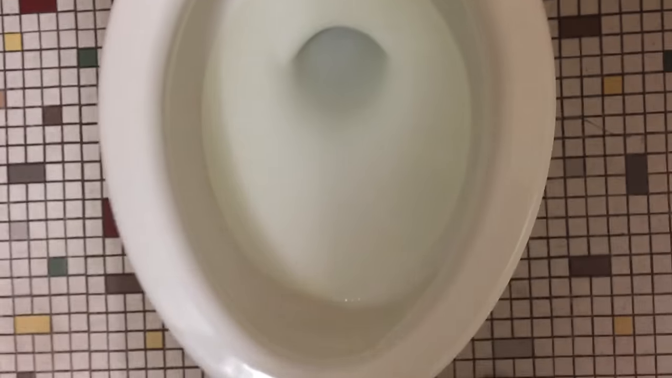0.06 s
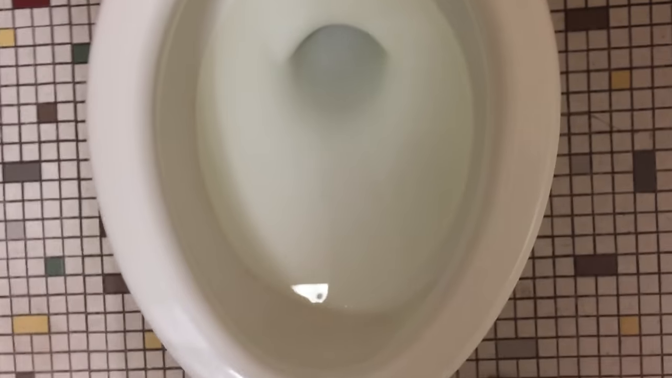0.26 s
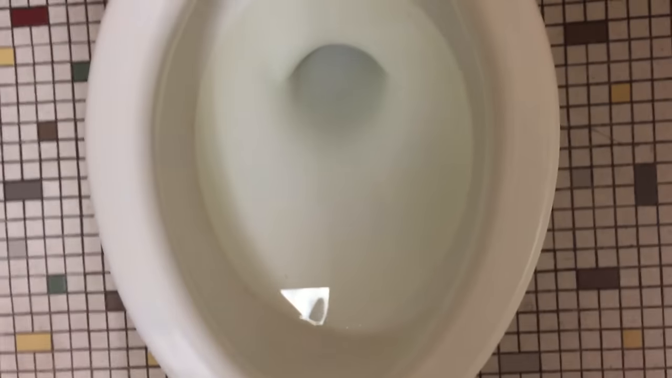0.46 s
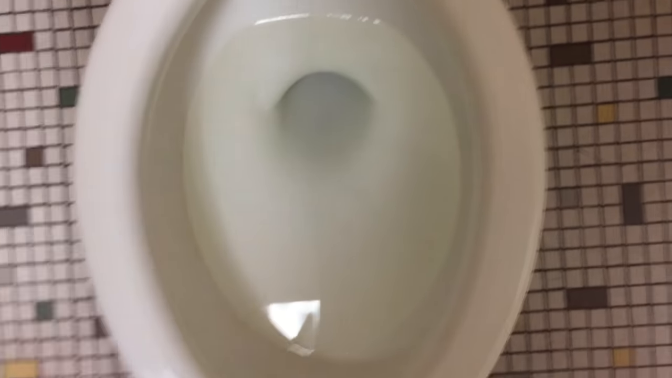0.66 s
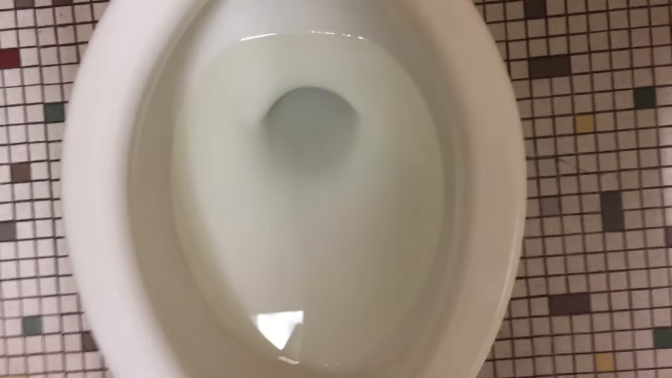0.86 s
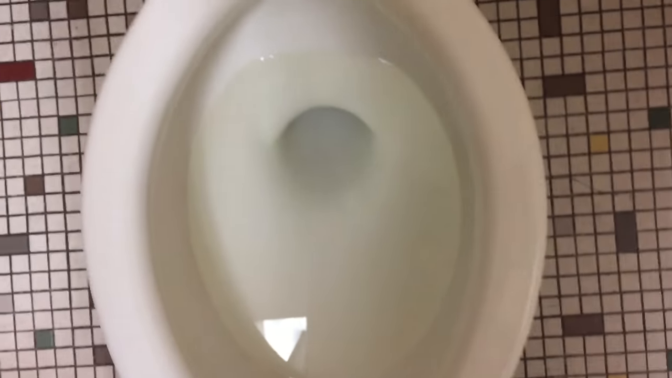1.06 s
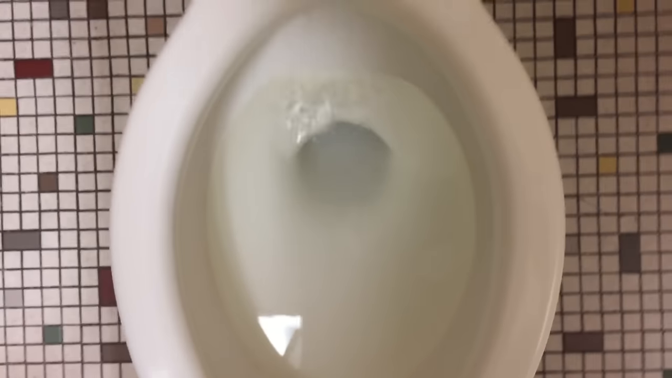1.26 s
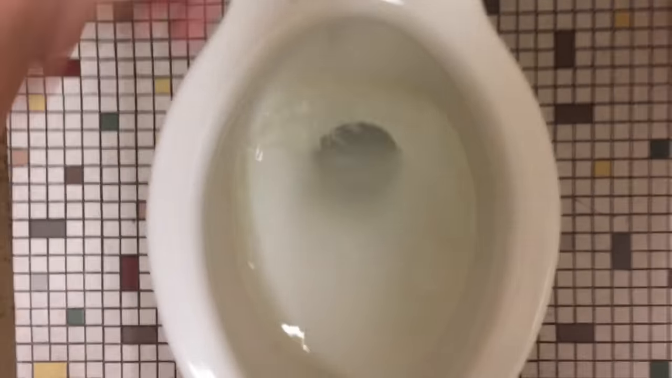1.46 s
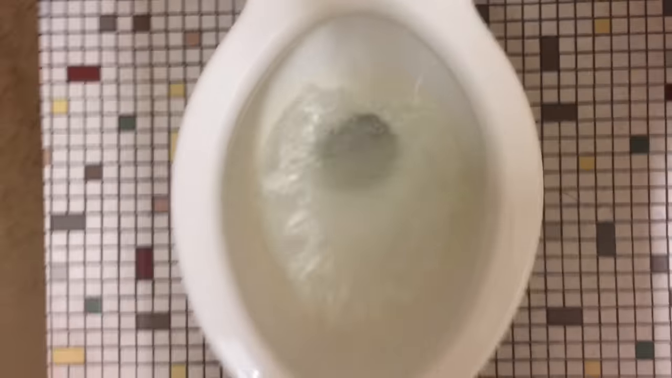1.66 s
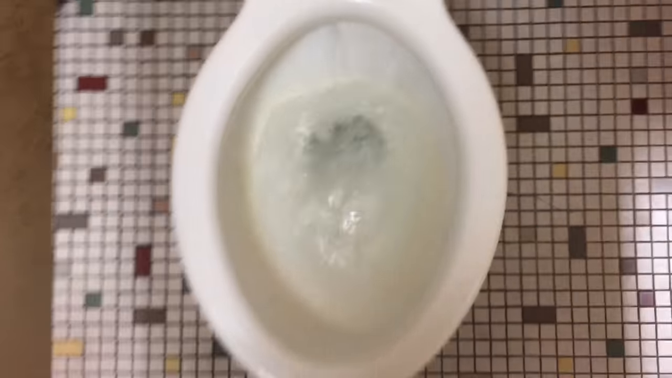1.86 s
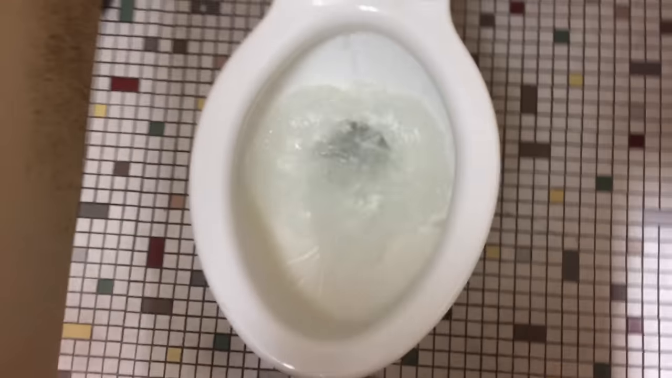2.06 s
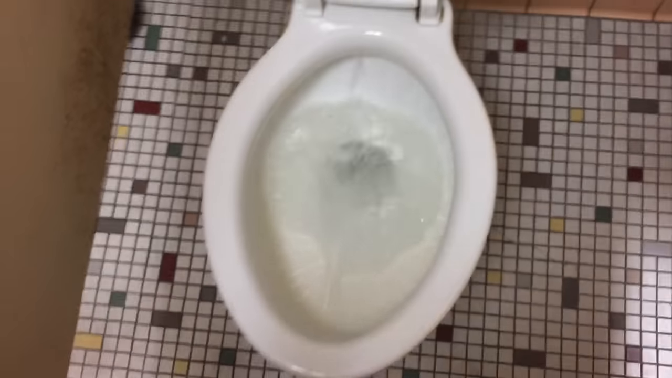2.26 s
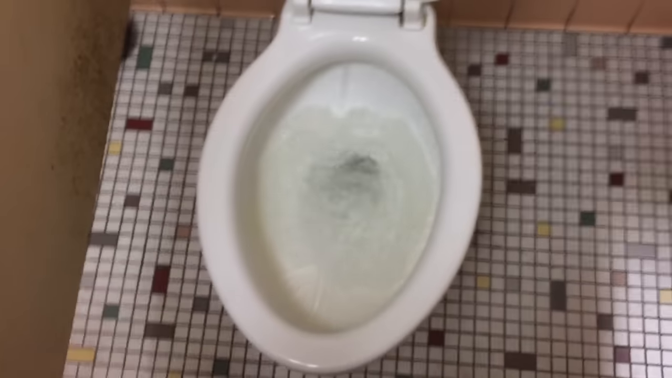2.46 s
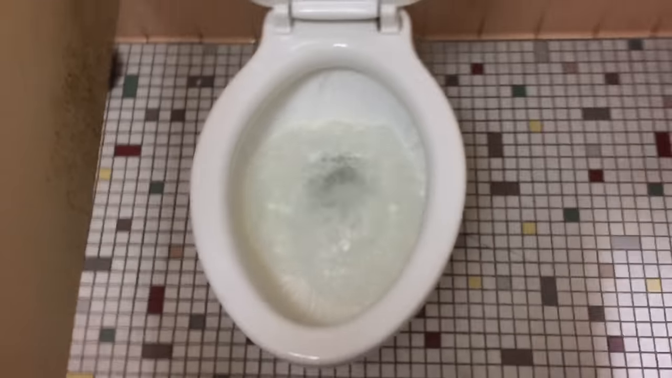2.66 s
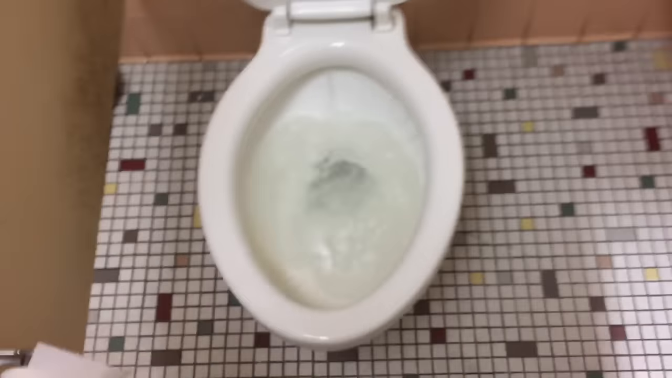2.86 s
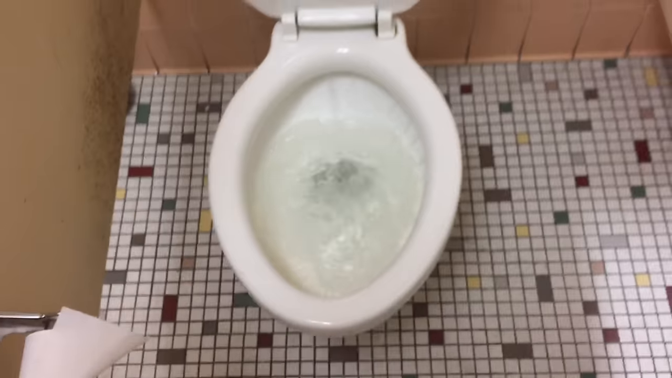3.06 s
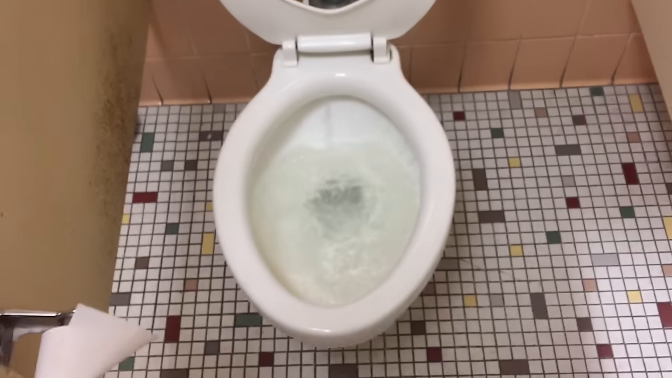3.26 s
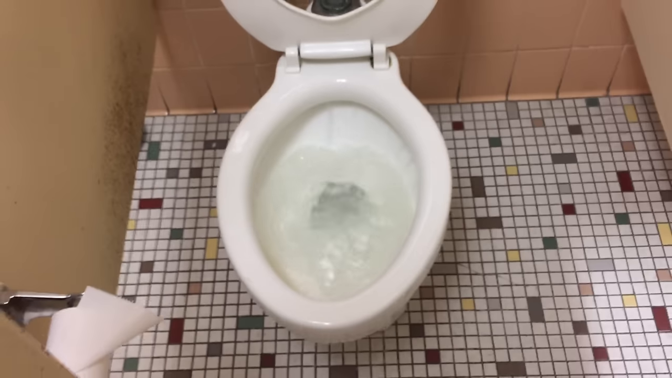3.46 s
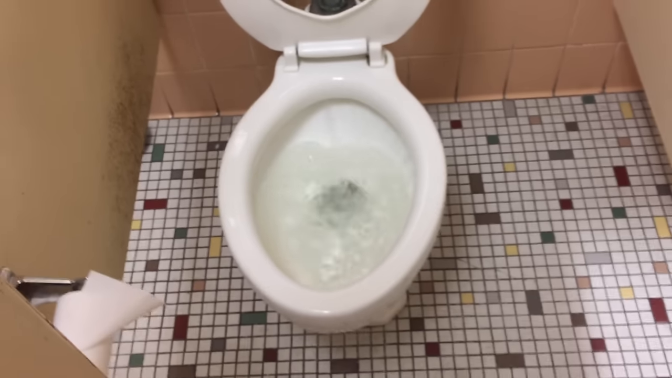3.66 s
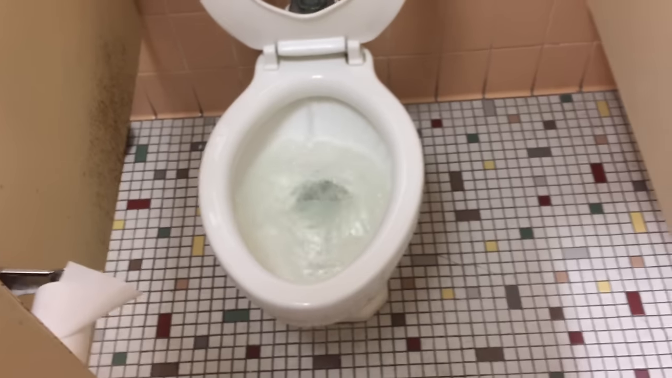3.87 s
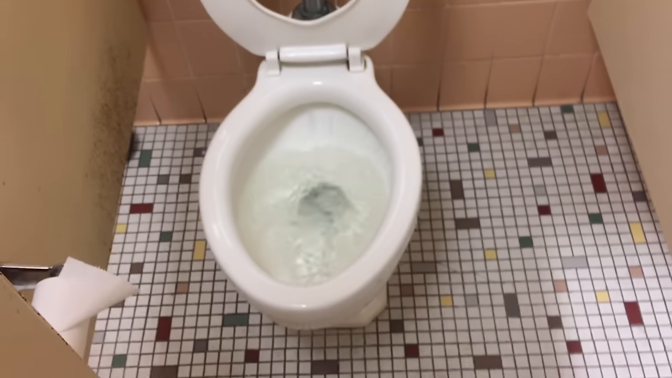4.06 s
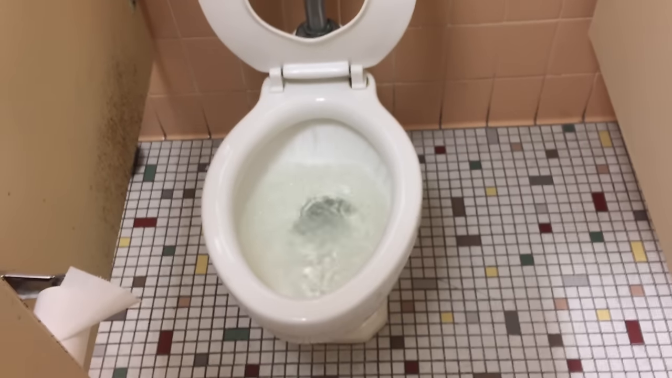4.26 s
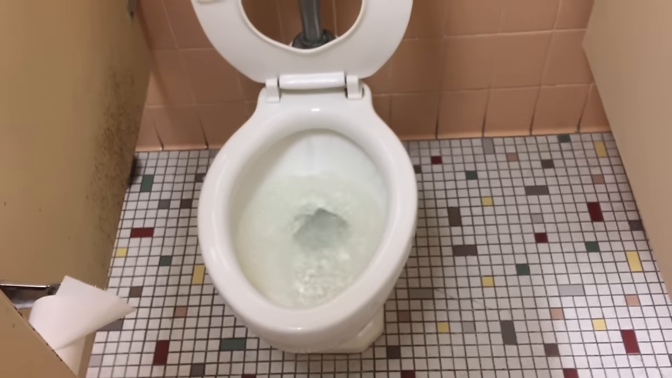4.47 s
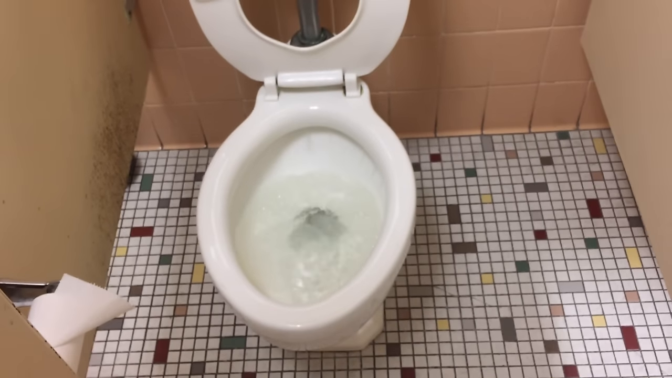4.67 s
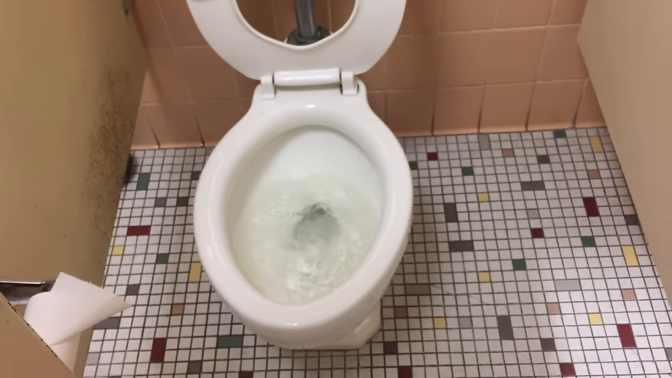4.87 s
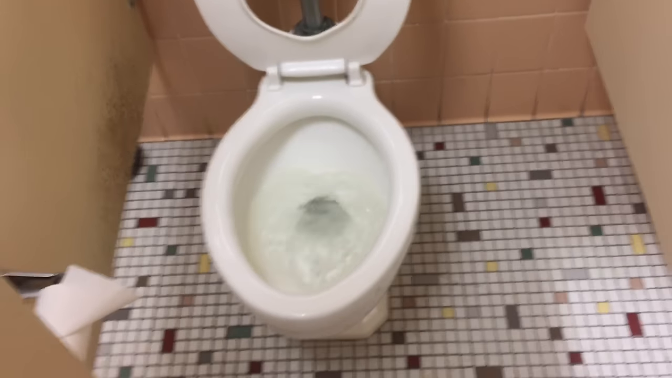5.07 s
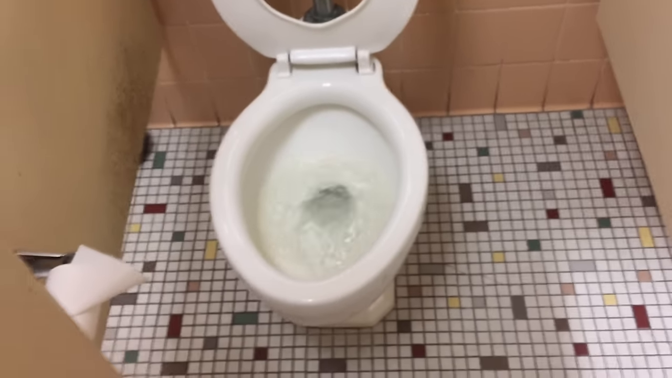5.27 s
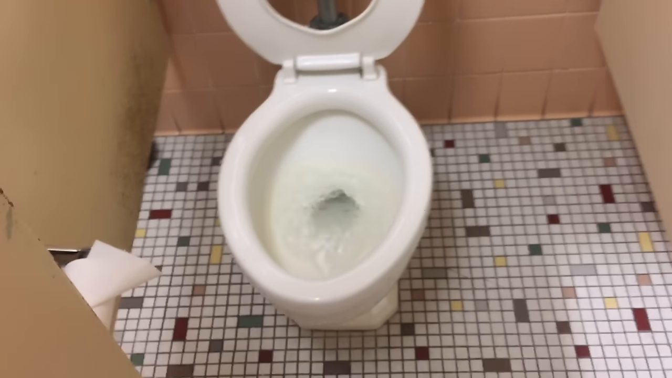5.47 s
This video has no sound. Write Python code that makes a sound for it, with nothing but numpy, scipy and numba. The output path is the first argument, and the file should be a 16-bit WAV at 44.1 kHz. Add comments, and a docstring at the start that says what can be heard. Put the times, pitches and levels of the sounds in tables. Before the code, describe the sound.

In a small tiled restroom stall, close above the bowl, faint scuffs, dull bumps and a sharp metallic clack come first. A tiny squeak leads into a sudden hollow, gurgling roar of the flush. Bright splashing and bubbling water follows, loudest soon after, then gradually thins to slaps and trickles beneath a steady valve hiss. Mono-like, with short tile echo.

```python
"""A small tiled stall with a flush-valve toilet, heard from above the bowl.
A clack and dull bumps come first: struck fittings ring in damped modes and the stall booms in its low modes.
Then the valve squeaks open by stick-slip and hisses, and a jet drives air pockets through the resonant trap.
Rim water splashes as showers of ringing bubbles and gurgles in the air modes of the bowl.
The splash dies away under the hiss of the valve, which is turbulence noise."""
import sys
import numpy as np
from scipy import signal
from scipy.fft import rfft, irfft
from scipy.io import wavfile
from scipy.ndimage import uniform_filter1d, map_coordinates
from numba import njit

SR = 44100
rng = np.random.default_rng(int(sys.argv[2]) if len(sys.argv) > 2 else 0)


def dump_mix(stems):
    """Bounce the given channels to the path in sys.argv[1] as a 16-bit WAV at rate SR."""
    frames = np.atleast_2d(stems).T  # one column per channel
    limited = np.clip(frames, -1, 1)  # hard clip at full scale
    pcm = np.round(limited * 32767).astype(np.int16)
    wavfile.write(sys.argv[1], SR, pcm)


N = 242991
TIME = np.arange(N) / SR
TOP_HZ = 15800  # upper limit of the finished sound

# rim water landing in the bowl, which drives splash, bubbles and gurgle: (time [s], flow [dB])
RIM_FLOW = [(1.08, -14), (1.2, -8), (1.35, -19), (1.57, -10), (1.68, -0.5), (1.92, -3), (2.05, -4),
            (2.6, -6), (2.72, -8), (4.58, -10.5), (5.0, -13), (5.18, -20), (5.51, -21)]
# level of the fine spray: (time [s], level [dB])
SPRAY_LEVEL = [(1.08, -47), (1.35, -39.5), (1.65, -33.5), (2.1, -30.5), (3.1, -33.5), (3.8, -33.5),
               (4.53, -36), (4.68, -41), (4.82, -35), (5.51, -44)]
# spectrum of splashing water: (frequency [Hz], level [dB])
SPLASH_SPECTRUM = [(40, -65), (300, -46), (1000, 5.5), (1450, -11), (2100, 0), (2800, 1), (3600, -1.5),
                   (4200, -4.5), (4900, -13), (6000, -11), (9000, -11.5), (16000, -42)]
# spectrum of water forced through the valve: (frequency [Hz], level [dB])
VALVE_SPECTRUM = [(40, -18), (200, 0.5), (1200, -8.5), (2000, -22), (2500, 3), (2900, -2), (3300, 1),
                  (3900, 1.5), (4900, -8.5), (5500, 1.5), (6500, 0.5), (7650, -8), (8800, -3.5),
                  (10450, -8), (10900, -9.5), (12800, -7), (16000, -8)]


def undb(db):
    """Amplitude gain is ten to the power of decibels over twenty."""
    return 10 ** (np.asarray(db) / 20)


def unit(x):
    """Normalisation of the effective (rms) value to 1."""
    return x / np.sqrt(np.mean(x ** 2))


def curve(table, axis=1):
    """Linear interpolation in time of one column of a table."""
    rows = np.array(table)
    return np.interp(TIME, rows[:, 0], rows[:, axis])


def fader(table, axis=1):
    """Amplitude envelope from a dB column, decaying exponentially away from its span in time."""
    before = np.maximum(table[0][0] - TIME, 0)
    after = np.maximum(TIME - table[-1][0], 0)
    return undb(curve(table, axis=axis) - 400 * (before + after))  # 400 dB per s


def swell(start_s, rise_s, fade_db_per_s):
    """Raised-sine onset to 1, then exponential decay (a constant number of dB per second)."""
    age = TIME - start_s
    onset = np.sin(np.pi / 2 * np.clip(age / rise_s, 0, 1)) ** 2
    return onset * undb(-fade_db_per_s * np.maximum(age - rise_s, 0))


def surges(table, release_s, axis=2):
    """Attack, hold and release envelopes, one for each row (time [s], length [s], level [dB], ..)."""
    out = np.zeros(N)
    attack_s = 0.012
    for row in table:
        age = TIME[:int((row[1] + release_s) * SR)]
        release = np.clip((row[1] - age) / release_s + .5, 0, 1)  # centred on the stated length
        shape = np.minimum(age / attack_s, 1) * release
        start = int(row[0] * SR)
        out[start:start + len(age)] += undb(row[axis]) * shape[:N - start]
    return out


def steady(x, span_s):
    """Short-term rms levelling over spans of this length; faster flutter stays."""
    size = int(span_s * SR)
    power = uniform_filter1d(uniform_filter1d(x ** 2, size), size)
    return x / np.sqrt(np.abs(power) + 1e-12)


def walk(rate):
    """Low-frequency random modulation: held normal values, smoothed, at this many values per second."""
    size = int(SR / rate)
    steps = np.repeat(rng.standard_normal(N // size + 1), size)
    return uniform_filter1d(steps, size)[:N]


def colour(x, points):
    """Minimum-phase filtering, by the folded cepstrum, through points (frequency [Hz], level [dB])."""
    hz, db = np.transpose(points)
    size = 8192
    grid = np.maximum(np.arange(size // 2 + 1) * SR / size, 1)
    cepstrum = irfft(np.log(undb(np.interp(np.log(grid), np.log(hz), db))))
    cepstrum[1:size // 2] *= 2
    cepstrum[size // 2 + 1:] = 0
    response = irfft(np.exp(rfft(cepstrum)))
    return signal.fftconvolve(x, response)[:len(x)]


def resonate(x, modes):
    """Modal superposition of parallel resonances (frequency [Hz], width [Hz], level [dB])."""
    return sum(undb(db) * signal.lfilter(*signal.iirpeak(hz, hz / width, fs=SR), x)
               for hz, width, db in modes)


def cavity(x, modes):
    """Cascaded resonance: each mode (as in resonate) acts twice, so the valleys between them are deep."""
    return unit(sum(resonate(resonate(x, [(hz, width, 0)]), [(hz, width, db)]) for hz, width, db in modes))


def add(out, s, x, db):
    """Superposition of an event at s seconds whose first 20 ms have this rms level."""
    start = int(s * SR)
    x = x * undb(db) / np.sqrt(np.mean(x[:SR // 50] ** 2))
    out[start:start + len(x)] += x[:N - start]


def burst(t60_s):
    """Exponential decay of noise, by 60 dB in t60_s, over half a second."""
    t = TIME[:SR // 2]
    return rng.standard_normal(len(t)) * np.exp(-np.log(1000) * t / t60_s)


@njit
def ring(starts, hz, cycles, sizes, glide, length):
    """Bubble resonance: each is a dying sine whose pitch rises as it nears the surface."""
    out = np.zeros(length)
    for k in range(len(starts)):
        life = cycles[k] * SR / hz[k]  # in samples
        phase = 0.
        for i in range(min(int(life), length - starts[k])):
            phase += 2 * np.pi * hz[k] / SR * (1 + glide * i / life)
            out[starts[k] + i] += sizes[k] * np.exp(-5.5 * i / life) * np.sin(phase)
    return out


def bubbles(rate, low_hz, high_hz, cycles, spread_db, glide):
    """Random superposition of bubbles, rate per second; a positive spread makes a few much louder."""
    when, pitch, life, size = rng.random((int(rate * N / SR), 4)).T
    hz = low_hz * (high_hz / low_hz) ** pitch
    sizes = undb(-spread_db * np.log(1 - .99 * size))
    starts = (when * N).astype(np.int64)
    return unit(ring(starts, hz, cycles * (.5 + life), sizes, glide, N))


def jet():
    """Cavity excitation: the jet drives air pockets through the trap, the largest bursting one by one."""
    # spectrum of the roar: (frequency [Hz], level [dB])
    roar_spectrum = [(18, -72), (30, -73), (76, -5), (130, -15.5), (154, -5.5), (185, -28), (215, -7),
                     (347, 2), (445, -17), (721, -13), (841, -29), (1000, -17), (1120, -27.5), (1560, -51),
                     (1720, -28.5), (3000, -40), (3900, -65), (6600, -120)]
    # resonances of the air in the trap: (frequency [Hz], width [Hz], level [dB])
    trap_modes = [(216, 19, -0.5), (304, 35, 1.5), (346, 52, 1), (417.7, 29, 1.5), (475, 84, -6.5),
                  (568, 37, -1), (714, 33, -6), (784, 23, -4), (967, 92, -12), (1743, 25, -15),
                  (2020, 38, -17)]
    # slugs of air bursting in the trap: (time [s], level [dB], frequency [Hz])
    slugs = [(1.047, -27, 282), (1.101, -21.5, 412), (1.141, -18, 982), (1.185, -16.5, 356),
             (1.253, -8, 353.6), (1.279, -12, 307.5), (1.338, -16, 350), (1.425, -33, 400)]
    # starts abruptly, builds to a crest and dies as the air is driven out
    start_s, rise_s, crest_s, crest_db = 1, 0.084, 1.256, -12
    build_db_per_s, fade_db_per_s = 39, 69
    pockets = cavity(rng.standard_normal(N) * undb(2 * walk(58.3)), trap_modes)
    roar = unit(colour(rng.standard_normal(N) * undb(1.2 * walk(70)), roar_spectrum))
    below_crest = np.maximum(build_db_per_s * (crest_s - TIME), fade_db_per_s * (TIME - crest_s))
    drive = undb(crest_db - below_crest) * swell(start_s, rise_s, 0)
    out = unit(steady(roar + undb(-0.5) * pockets, 0.065)) * drive
    t = TIME[:SR // 2]
    for s, db, hz in slugs:
        envelope = (1 - np.exp(-t / 0.0061)) * np.exp(-t / 0.021)
        add(out, s, np.sin(2 * np.pi * hz * t) * envelope, db)
    return out


def gurgle():
    """Forced air modes: water tumbling into the drain rings the bowl, with the flow and at each glug."""
    # deep and upper modes of the air in the bowl: (frequency [Hz], width [Hz], level [dB])
    deep_modes = [(211, 17, -7.5), (275, 20.5, 0), (341.3, 71, 1.5), (462, 17, -11), (609, 42.5, -0.5),
                  (689, 12.5, -6.5), (767.6, 10, -5)]
    upper_modes = [(975.4, 71, 2.5), (1054, 13, -4.5), (1329, 85, -3), (1652, 60, -0.5), (1975, 46, -1.5)]
    # water folding into the drain: (time [s], length [s], deep ring level [dB], upper ring level [dB])
    glug_times = [(1.6, 0.24, -27, -35), (1.85, .18, -27.5, -30), (2.05, 0.09, -36, -36),
                  (2.2, 0.055, -32, -31), (2.28, 0.11, -38, -32), (2.38, 0.082, -31.5, -34.5),
                  (2.48, 0.16, -30, -35.5), (2.68, .04, -32, -48), (2.855, 0.056, -31, -47),
                  (2.96, 0.1, -49, -37), (3.085, 0.063, -32.5, -32.5), (3.185, 0.05, -31.5, -37),
                  (3.29, 0.045, -31.5, -33), (3.485, 0.016, -27.5, -33), (3.56, 0.14, -34.5, -40),
                  (3.78, 0.12, -49, -46), (3.96, 0.1, -37.5, -36), (4.195, 0.056, -33, -34.5),
                  (4.32, 0.098, -42, -43), (4.505, 0.079, -33.5, -39), (4.675, 0.031, -32.5, -36),
                  (4.94, 0.14, -45, -63)]
    release_s = 0.074
    # level at full flow, and dB moved for each dB of flow
    deep_db, deep_law = -35.5, 0.77
    upper_db, upper_law = -34, 0.83
    glugs = bubbles(rate=180, low_hz=256.4, high_hz=735, cycles=30.6, spread_db=6.5, glide=0.43)
    glugs = signal.sosfilt(signal.butter(2, 200, "high", fs=SR, output="sos"), glugs)
    plops = bubbles(rate=440, low_hz=815, high_hz=1675, cycles=21, spread_db=-5.0, glide=0.13)
    wash = rng.standard_normal(N) * undb(3.1 * walk(40))
    deep = steady(cavity(wash, deep_modes) + undb(-6.5) * glugs, 0.045)
    # the upper modes rise as the bowl empties, and waver with the waves: read at a varying speed
    pitch = 1 + .014 * (TIME - 2.5) + 0.004985 * walk(9)
    moving = map_coordinates(cavity(wash, upper_modes), [np.cumsum(pitch)], mode="mirror")
    upper = steady(moving + undb(-13) * plops, 0.041)
    # the steady gurgle falls back at once when the drain clears
    flow = fader(RIM_FLOW) * undb(-1.5 * swell(2.4, .02, 0))
    deep_gain = np.hypot(undb(deep_db) * flow ** deep_law, surges(glug_times, release_s))
    upper_gain = np.hypot(undb(upper_db) * flow ** upper_law, surges(glug_times, release_s, axis=3))
    return deep * deep_gain + upper * upper_gain


def splash():
    """Bubble-cloud radiation: rim water breaks into small bubbles and crackling spray, in uneven spurts."""
    # spectrum of the spray: (frequency [Hz], level [dB])
    spray_spectrum = [(100, -40), (1500, -20), (4000, 1), (4900, 2.5), (5800, 1), (7600, 1), (9200, 0),
                      (10450, -9.5), (11100, 0), (15500, -12), (17000, 7.5)]
    # spurts from the rim holes: (time [s], length [s], splash level [dB], spray level [dB])
    spurts = [(1.51, 0.021, -28, -46), (1.66, 0.061, -39.5, -32), (1.755, 0.048, -31, -45),
              (2.14, 0.055, -34, -41), (2.52, 0.042, -42, -29), (3.045, 0.012, -42, -21),
              (3.085, 0.039, -44, -28), (3.65, 0.019, -37, -42), (4.0, 0.025, -41, -47),
              (4.425, 0.024, -43, -32.5), (4.5, 0.028, -45, -37), (4.66, 0.034, -45, -54.5)]
    release_s = 0.011
    sheet_db, sheet_law = -24, 1.18  # level at full flow, and dB moved for each dB of flow
    flutter = undb(1.0 * walk(35) + 1.5 * walk(160))
    fizz = bubbles(rate=2000, low_hz=1429, high_hz=6940, cycles=45.7, spread_db=2.0, glide=0.22)
    sheet = unit(colour(fizz + undb(-1) * rng.standard_normal(N), SPLASH_SPECTRUM))
    drops = bubbles(rate=6500, low_hz=3710, high_hz=15500, cycles=7.1, spread_db=3.0, glide=.05)
    spray = unit(colour(drops + undb(-3.5) * rng.standard_normal(N), spray_spectrum))
    sheet_gain = np.hypot(undb(sheet_db) * fader(RIM_FLOW) ** sheet_law, surges(spurts, release_s))
    spray_gain = np.hypot(fader(SPRAY_LEVEL), surges(spurts, release_s, axis=3))
    return steady(sheet * flutter, 0.046) * sheet_gain + steady(spray * flutter, 0.63) * spray_gain


def churn():
    """Air entrainment: strong flow drags large bubbles under; they vanish quickly as it eases."""
    large = bubbles(rate=540, low_hz=1673, high_hz=2340, cycles=134, spread_db=2.0, glide=0.22)
    full_flow_db, law = -27.5, 2.54  # law: dB moved for each dB of flow
    return steady(large, .06) * undb(full_flow_db) * fader(RIM_FLOW) ** law


def slaps():
    """Impact and bubble resonance: a wave folds over in a splat and a cluster of bubbles of like size."""
    # single slaps of water: (time [s], level [dB], bubble frequency [Hz])
    slap_times = [(1.666, -26.5, 2050), (1.765, -26.5, 2100), (1.905, -26, 2040), (2.148, -27, 2140),
                  (2.236, -27, 1930), (2.474, -40, 2830), (2.649, -29, 1900), (2.733, -34, 1890),
                  (2.786, -29.5, 1910), (2.838, -26, 1815), (3.0, -30, 1890), (3.086, -33, 2520),
                  (3.225, -35, 2450), (3.31, -29.5, 2960), (3.665, -36, 2420), (3.858, -34, 2330),
                  (3.941, -32, 3350), (3.983, -33, 3600), (4.012, -29.5, 2280), (4.138, -31, 2310),
                  (4.215, -30.5, 2740), (4.442, -33, 2430), (4.515, -33.5, 2600), (4.544, -37.5, 2340),
                  (4.577, -35, 1820), (4.627, -32.5, 2270), (4.68, -33, 2330), (4.768, -38, 2360),
                  (4.895, -36, 2000), (4.967, -40, 2180), (5.228, -42, 1700), (5.335, -43, 1590)]
    cluster_s, spread_octaves = .024, 0.43
    out = np.zeros(N)
    for s, db, hz in slap_times:
        lag, pitch, size = rng.random((9, 3)).T  # nine bubbles
        starts = ((np.arange(len(lag)) + lag) / len(lag) * cluster_s * SR).astype(np.int64)
        pitches = hz * 2 ** (spread_octaves * (pitch - .5))
        cluster = ring(starts, pitches, 28 + 30 * size, 0.31 + size, 0.097, SR // 2)
        splat = unit(colour(burst(0.029), SPLASH_SPECTRUM))
        add(out, s, unit(cluster) + undb(-6.5) * splat, db)
    return out


def smacks():
    """Impact noise: stray drops hit the porcelain with a bright, short-lived tick."""
    # drops that smack the porcelain: (time [s], level [dB])
    drop_times = [(1.665, -38), (1.762, -34), (2.41, -31), (2.473, -36), (2.589, -31), (2.879, -35),
                  (3.054, -45), (3.087, -34), (3.307, -32), (3.8, -46), (3.987, -38), (4.515, -32)]
    tick_spectrum = [(500, -28), (2000, -4), (3800, 4), (8000, -1), (16000, -12.5)]  # ([Hz], [dB])
    out = np.zeros(N)
    for s, db in drop_times:
        add(out, s, colour(burst(0.019), tick_spectrum), db)
    return out


def tinkle():
    """Lightly damped bubble resonance: lone droplets leave tiny bubbles that ring out above the spray."""
    pings = bubbles(rate=170, low_hz=2600, high_hz=9500, cycles=110, spread_db=3.5, glide=.05)
    return steady(pings, 0.4) * undb(-7) * fader(SPRAY_LEVEL)


def streams():
    """Resonance under noise drive: thin streams ring a hollow note from the bowl once the water is low."""
    # streams that strike the bared bowl: (time [s], length [s], level [dB])
    strikes = [(2.84, 0.028, -33), (3.49, 0.024, -32), (3.63, .03, -35.5), (4.14, 0.073, -40),
               (4.33, 0.064, -43), (4.52, 0.23, -43.5), (4.93, 0.051, -47), (5.22, 0.076, -43.5)]
    mode_hz, width_hz, release_s = 1353, 61, 0.062
    note = steady(cavity(rng.standard_normal(N), [(mode_hz, width_hz, 0)]), 0.049)
    return note * surges(strikes, release_s)


def valve():
    """Turbulence noise: water hisses through the pipe and rings the hollow rim."""
    # water through the valve: (time [s], level [dB])
    valve_level = [(.975, -61), (.99, -37.5), (1.16, -31), (1.3, -37.5), (1.6, -32), (3, -29.5), (4.5, -33),
                   (4.75, -36.5), (4.81, -33.5), (5.05, -33), (5.3, -35), (5.51, -37)]
    # resonances of the hollow rim, rung by the water inside it: (frequency [Hz], width [Hz], level [dB])
    rim_modes = [(350, 190, -7.5), (627, 86, -1), (1036, 79, -9), (1350, 146, 1), (1654, 56, -4),
                 (2023, 60, 2.5), (2390, 120, 6.5), (2870, 180, 0.5), (3070, 92, 1), (3680, 72, -16)]
    flow = rng.standard_normal(N) * undb(1.78 * walk(120))
    rim = cavity(flow * undb(3.6 * walk(25)), rim_modes)
    hiss = unit(colour(flow, VALVE_SPECTRUM)) + undb(-10.0) * rim
    return hiss * fader(valve_level)


def drain():
    """Low-frequency flow noise: the trap rumbles below the bowl, less and less, and gulps now and then."""
    # spectrum of the rumble: (frequency [Hz], level [dB])
    rumble_spectrum = [(25, -14), (42, -11), (58, -19), (84, 8.5), (99, -10.5), (116, 5), (135, -7.5),
                       (155, -0.5), (185, -14), (230, -4.5), (400, -42.5)]
    # the trap gulps: (time [s], length [s], rumble level [dB])
    gulps = [(1.48, 0.069, -27), (1.79, 0.21, -38.5), (2.53, 0.1, -38), (3.34, 0.15, -44),
             (3.57, 0.078, -41)]
    # rumbles from the first rush on, and settles towards a murmur
    start_s, rise_s, first_db, end_db, settle_s = 0.92, 0.26, -27.5, -57, 1.88
    rumble = steady(colour(rng.standard_normal(N), rumble_spectrum), 0.18)
    push = np.exp(-np.maximum(TIME - start_s, 0) / settle_s)
    settling = undb(end_db + (first_db - end_db) * push) * swell(start_s, rise_s, 0)
    return rumble * np.hypot(settling, surges(gulps, 0.052))


def squeak():
    """Stick-slip oscillation: the seat squeaks, gliding up as it lifts, and a little water hisses past."""
    # harmonics of the squeak: (multiple of the fundamental, level [dB])
    partials = [(1, -19), (2, 0), (3, -15), (5, -15), (6, -19), (7, -23)]
    start_s, rise_s, level_db, fade_db_per_s, end_s = .917, .024, -42.5, 210, 1.0
    from_hz, to_hz, glide_at_s, glide_s = 1240, 1335, .95, .006
    lift = .5 + .5 * np.tanh((TIME - glide_at_s) / glide_s)
    hz = (from_hz + (to_hz - from_hz) * lift) * (1 + .012 * walk(1800))
    phase = 2 * np.pi * np.cumsum(hz) / SR
    tone = sum(undb(db) * np.sin(round(k) * phase) for k, db in partials)
    tone += undb(-10) * np.sin(phase / 2)  # every second slip is stronger
    tone *= undb(3 * walk(250))
    leak = undb(-8) * unit(colour(rng.standard_normal(N), VALVE_SPECTRUM))
    loudness = swell(start_s, rise_s, fade_db_per_s) * (1 - swell(end_s, 0.0071, 0))
    return (unit(tone) + leak) * undb(level_db) * loudness


def whistle():
    """Jet tone: the first thin jet whistles through the opening seat, its pitch settling from above."""
    start_s, level_db, fade_db_per_s = .936, -34.5, 600
    settled_hz, sharp_hz, settle_s = 11050, 1000, 0.0033
    hz = settled_hz + sharp_hz * np.exp(-np.maximum(TIME - start_s, 0) / settle_s)
    tone = np.sin(2 * np.pi * np.cumsum(hz * (1 + 0.022 * walk(2500))) / SR)
    return unit(tone) * undb(level_db) * swell(start_s, 0.0025, fade_db_per_s)


def knocks():
    """Impulsive modal excitation: knocks crack and ring the fittings; a softer contact is duller."""
    # the handle clacks, bounces and rattles:
    # (time [s], level [dB], contact corner frequency [Hz], contact decay time t60 [s])
    contacts = [(.001, -40.5, 3020, 0.11), (.043, -55, 1400, .03), (.074, -50, 800, .03),
                (.106, -56, 2000, 0.025), (.134, -53, 2500, .02), (.319, -49, 2500, 0.11),
                (.349, -29, 12000, .016), (.353, -32, 4000, 0.014), (.357, -38.5, 3000, .05),
                (.373, -48, 1800, .03), (.388, -40, 1800, .03), (.594, -46.5, 1300, 0.027),
                (.6, -39.5, 480, 0.064), (.631, -53, 9000, 0.044), (.652, -56, 700, .03),
                (.716, -61, 12000, .012), (.995, -46, 9000, .054)]
    # modes of the fittings: (frequency [Hz], level [dB], decay time t60 [s])
    fitting_modes = [(474, -16, .14), (775, -23, .16), (1044, -7, .16), (1184, 0, .12), (1249, -4, .13),
                     (1378, -9, .16), (1440, -5, .16), (1647, -6, .14), (1755, -4, .14), (1911, -2, .12),
                     (2153, -9, .15), (2428, -17, .12)]
    # spectrum of the crack: (frequency [Hz], level [dB])
    crack_spectrum = [(100, -33), (400, -9), (800, 1), (1150, 7.5), (1900, 0), (2400, -3.5), (3000, -9),
                      (4500, -9.5), (6300, -7), (8500, -17), (12000, -12), (16000, -16)]
    out, t = np.zeros(N), TIME[:SR // 2]
    for s, db, corner_hz, contact_s in contacts:
        phases = 2 * np.pi * rng.random(len(fitting_modes))
        body = sum(undb(mode_db) * np.exp(-np.log(1000) * t / t60) * np.sin(2 * np.pi * hz * t + phase)
                   for (hz, mode_db, t60), phase in zip(fitting_modes, phases))
        hit = unit(colour(burst(contact_s), crack_spectrum)) + undb(-3.5) * unit(body)
        add(out, s, signal.lfilter(*signal.butter(2, corner_hz, fs=SR), hit), db)
    return out


def scuff():
    """Friction noise: sparse grit impulses, filtered, fade away before the flush."""
    # spectrum of the scuff: (frequency [Hz], level [dB])
    scuff_spectrum = [(40, -18), (100, -3.5), (400, -14), (700, -21), (1020, -21), (1350, -21), (2000, -25),
                      (2600, -32.5), (5000, -40.5), (10000, -51), (15000, -48)]
    start_db, fade_db_per_s = -37.5, 78
    grit = rng.standard_normal(N) * (rng.random(N) < 900 / SR)  # about 900 grains per s
    rub = steady(colour(grit * undb(2.9 * walk(86)), scuff_spectrum), 0.03)
    return rub * undb(start_db - fade_db_per_s * TIME)


def creaks():
    """Frictional excitation: metal rubbing on metal chirps briefly as narrow-band noise."""
    # small creaks of the fittings: (time [s], frequency [Hz], level [dB], length [s])
    rubs = [(.115, 9630, -62, 0.043), (.12, 1500, -47, .03), (0.15, 1420, -51, .03),
            (0.197, 1440, -40, 0.012), (0.248, 3820, -61, 0.033), (0.258, 11750, -62, 0.044),
            (.272, 654, -51, .04), (0.312, 1070, -52, .032)]
    out = np.zeros(N)
    for s, hz, db, length_s in rubs:
        stroke = np.sin(np.pi * np.clip((TIME - s) / length_s, 0, 1))
        out += undb(db) * stroke * steady(cavity(rng.standard_normal(N), [(hz, 240, 0)]), .01)
    return out


def boom():
    """Room modes: each dull bump rings the low modes of the stall, over a little rumble."""
    # low modes of the stall: (frequency [Hz], level [dB], extra fade [dB/s])
    stall_modes = [(83, -4, 44), (115, -3, 11), (213, -16, 9)]
    # dull bumps: (time [s], rise [s], level [dB], fade [dB/s])
    bumps = [(.025, 0.022, -34.5, 99), (.235, 0.058, -35, 38), (.347, .01, -45, 89),
             (.582, 0.036, -27.5, 58)]
    out = np.zeros(N)
    rumble = undb(-12.5) * steady(cavity(rng.standard_normal(N), [(99, 84, 0)]), .04)
    for s, rise_s, db, fade in bumps:
        age = np.maximum(TIME - s, 0)
        tone = sum(undb(mode_db - extra * age) * np.sin(2 * np.pi * hz * age)
                   for hz, mode_db, extra in stall_modes)
        out += (tone + rumble) * undb(db) * swell(s, rise_s, fade)
    return out


def hum():
    """Pipe resonance: once the bowl has emptied, the air filling the hollow rim hums like a hollow pipe."""
    start_s, rise_s, mode_hz, width_hz, level_db = 3.05, 0.67, 171.4, 18, -49.5
    tone = steady(cavity(rng.standard_normal(N), [(mode_hz, width_hz, 0)]), 0.16)
    return tone * undb(level_db) * swell(start_s, rise_s, 0)


def air():
    """Broadband flow noise of faint ventilation, weighted to the low frequencies."""
    spectrum = [(25, -18), (80, 7.5), (300, 5.0), (1000, -17.0), (4000, -20), (16000, -31)]  # ([Hz], [dB])
    return undb(-61.0) * unit(colour(rng.standard_normal(N), spectrum))


def stall(x, room_db):
    """Reverberation: direct sound and the dense echo of the tiles, which dies sooner in the treble."""
    t60_s, treble_t60_s = 0.22, 0.15
    low, high = (signal.butter(2, 4000, kind, fs=SR) for kind in ("low", "high"))
    tail = signal.lfilter(*low, burst(t60_s)) + undb(-2.5) * signal.lfilter(*high, burst(treble_t60_s))
    tail *= TIME[:len(tail)] > .004  # the echo starts after 4 ms
    tail *= undb(room_db) / np.sqrt(t60_s * SR / (2 * np.log(1000)))
    return (x + signal.fftconvolve(x, tail)[:N]) / np.sqrt(1 + undb(2 * room_db))


def scene():
    """Linear superposition of all sources, reaching both channels alike."""
    fittings = stall(knocks() + scuff() + creaks() + squeak() + whistle(), room_db=-4.5)
    water = stall(valve() + splash() + churn() + slaps() + smacks() + tinkle(), room_db=-9)
    mono = fittings + water + boom() + jet() + gurgle() + streams() + drain() + hum() + air()
    return np.array([mono, mono])


def record(dry):
    """Band limiting and saturation: drop the deep bass, round the highest peaks and cut the top."""
    thin = signal.sosfilt(signal.butter(2, 42, "high", fs=SR, output="sos"), dry)
    rounded = np.tanh(thin)
    return signal.sosfilt(signal.ellip(10, .2, 70, TOP_HZ, fs=SR, output="sos"), rounded)


dry = scene()
out = record(dry)
dump_mix(out)
```